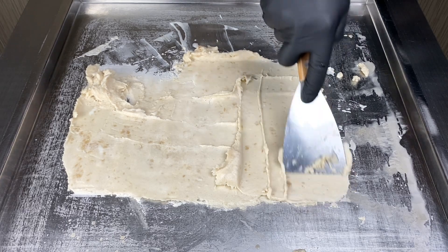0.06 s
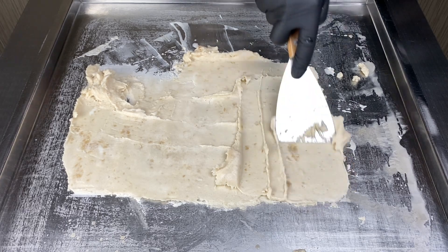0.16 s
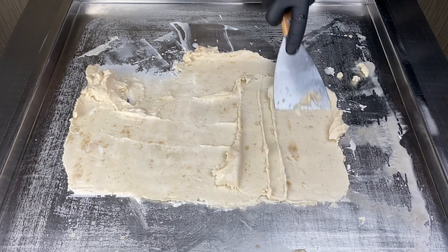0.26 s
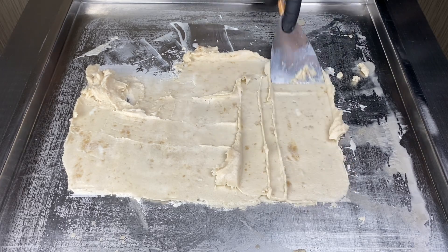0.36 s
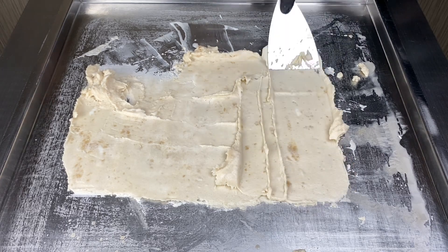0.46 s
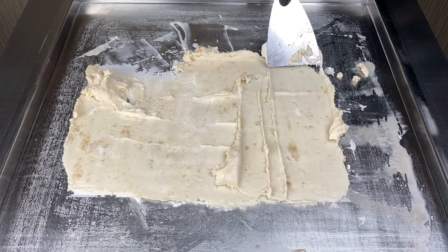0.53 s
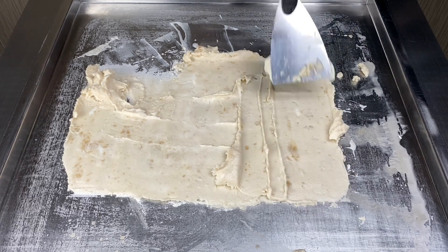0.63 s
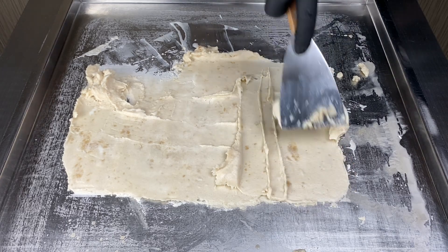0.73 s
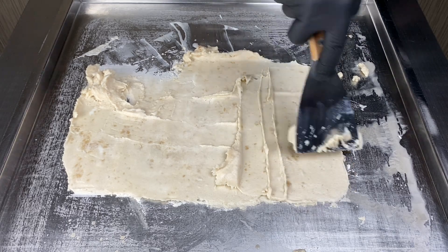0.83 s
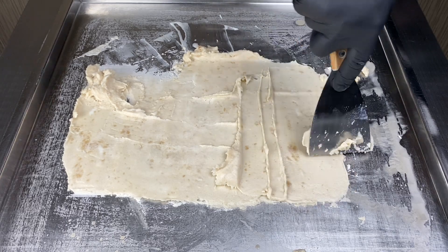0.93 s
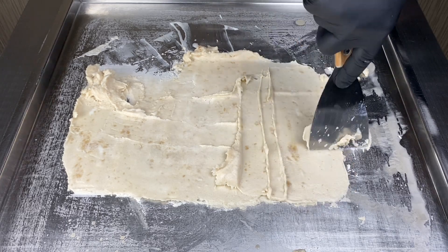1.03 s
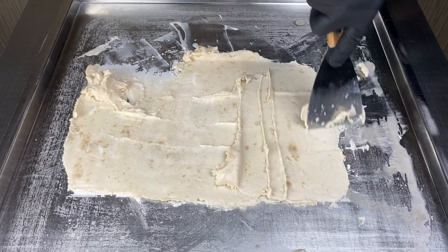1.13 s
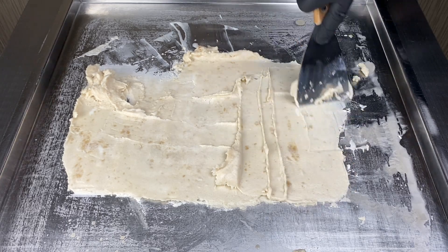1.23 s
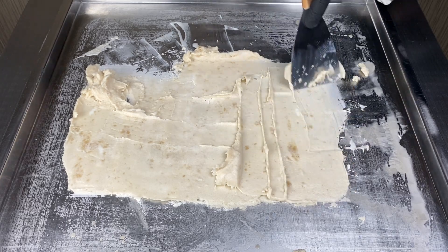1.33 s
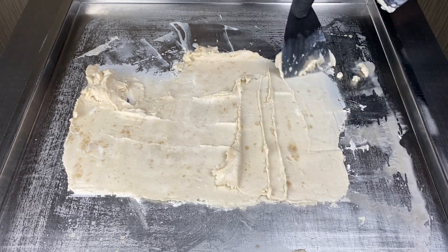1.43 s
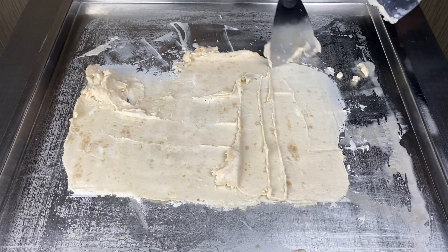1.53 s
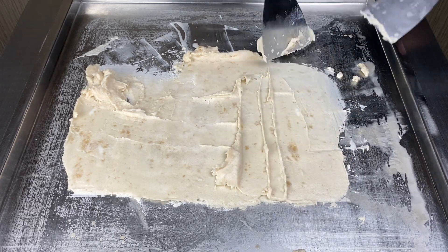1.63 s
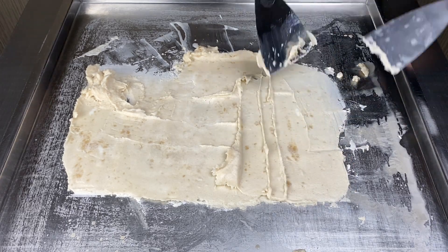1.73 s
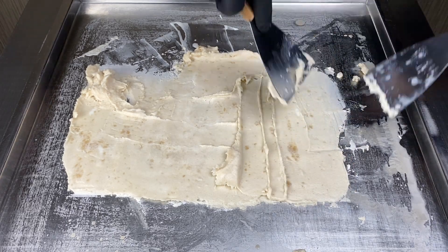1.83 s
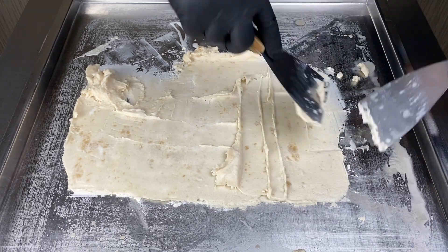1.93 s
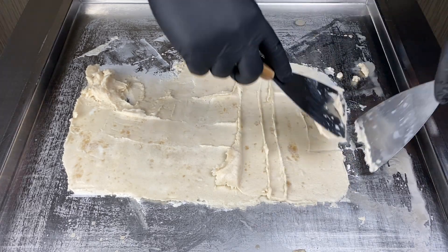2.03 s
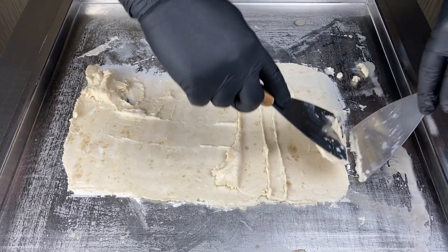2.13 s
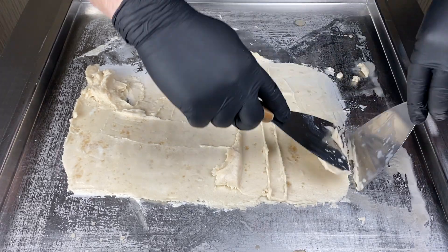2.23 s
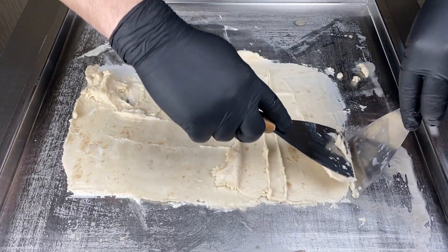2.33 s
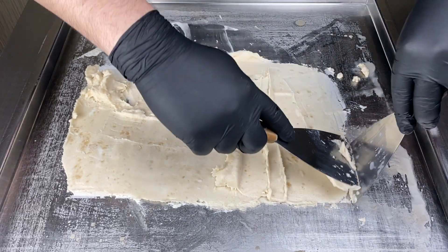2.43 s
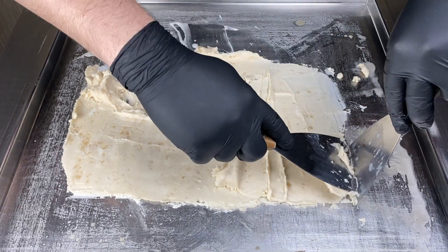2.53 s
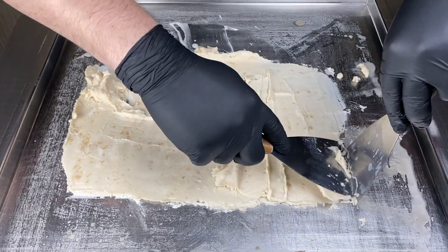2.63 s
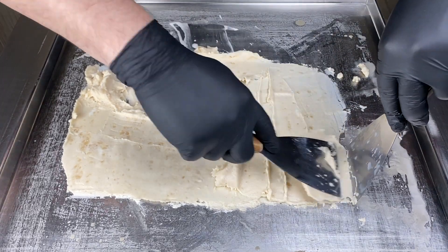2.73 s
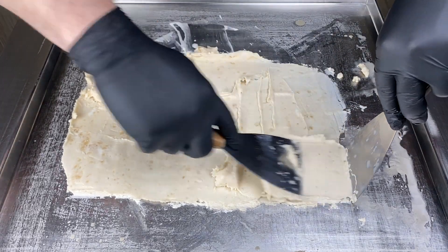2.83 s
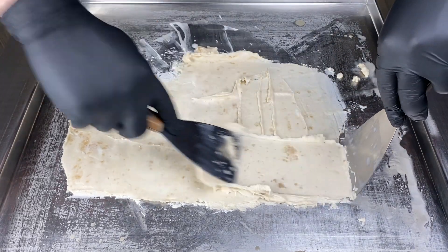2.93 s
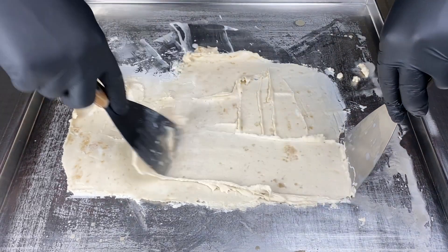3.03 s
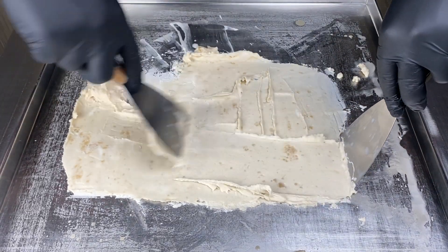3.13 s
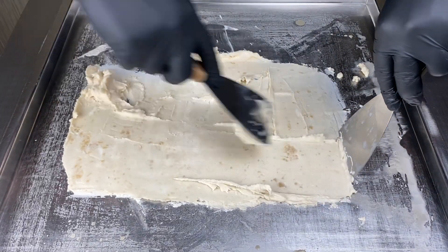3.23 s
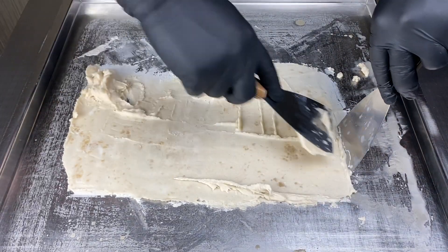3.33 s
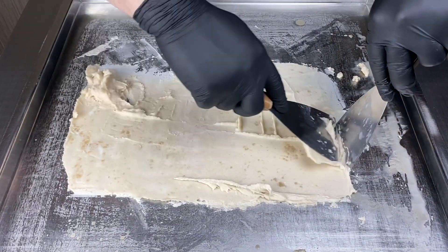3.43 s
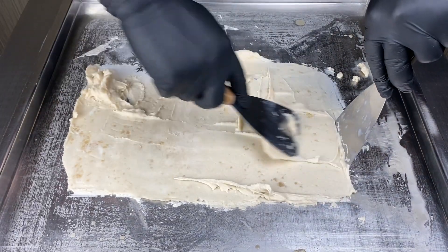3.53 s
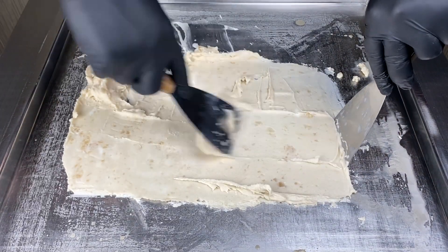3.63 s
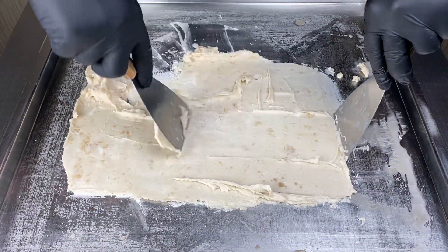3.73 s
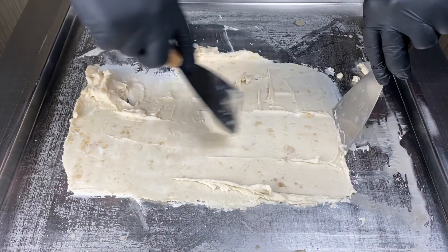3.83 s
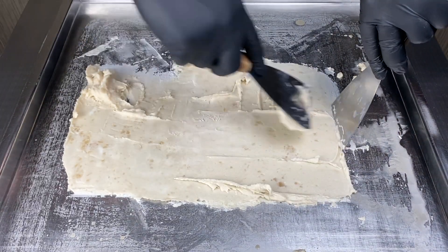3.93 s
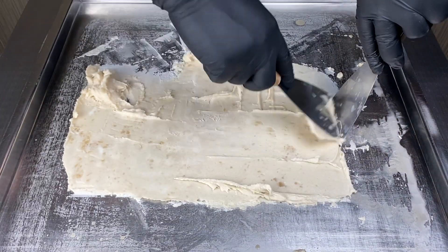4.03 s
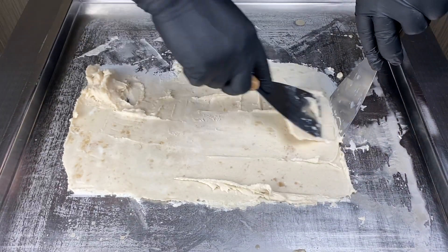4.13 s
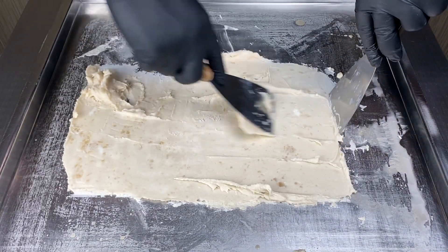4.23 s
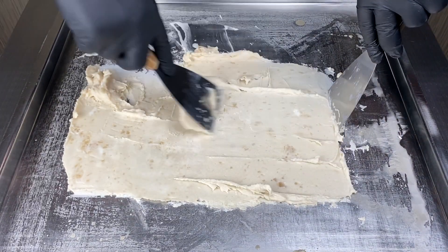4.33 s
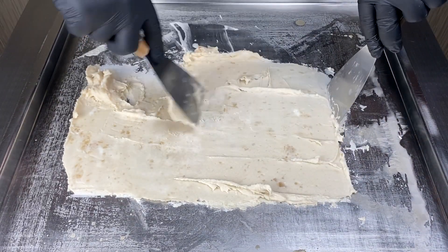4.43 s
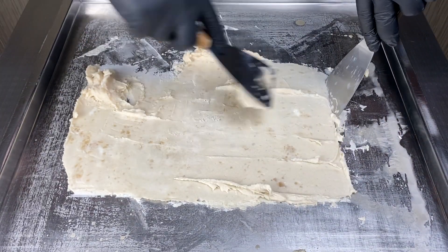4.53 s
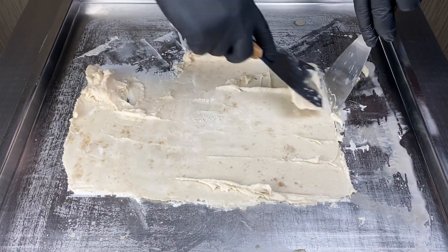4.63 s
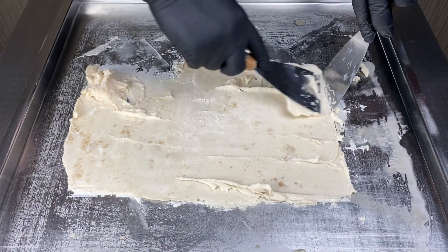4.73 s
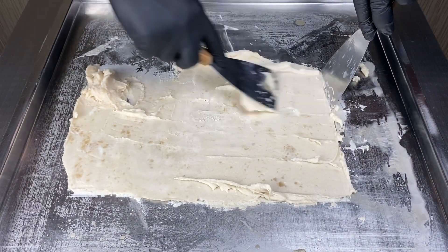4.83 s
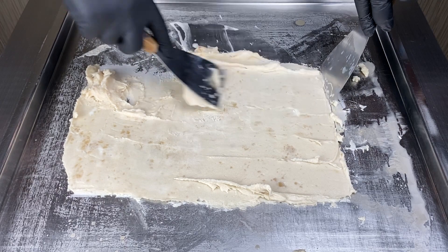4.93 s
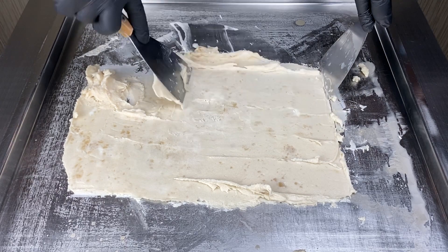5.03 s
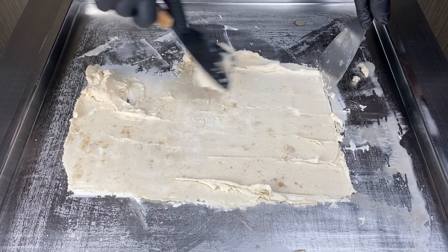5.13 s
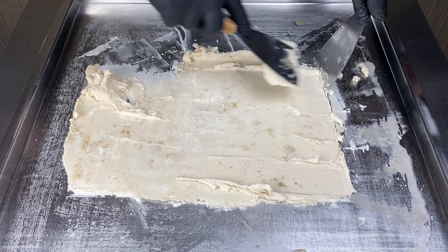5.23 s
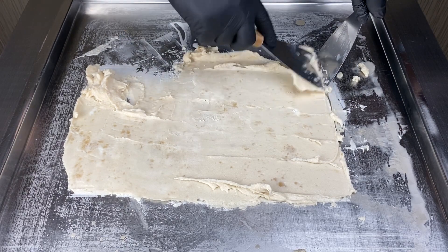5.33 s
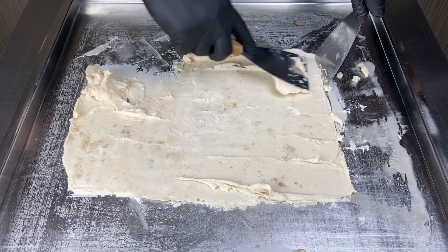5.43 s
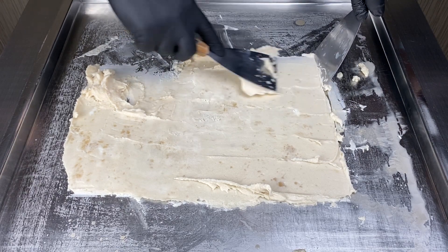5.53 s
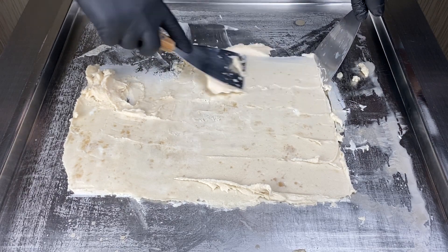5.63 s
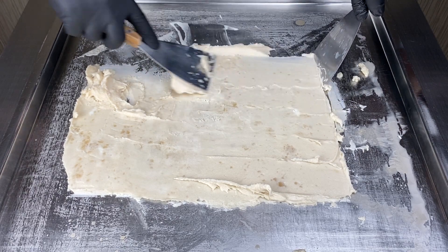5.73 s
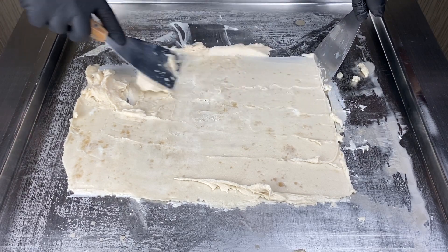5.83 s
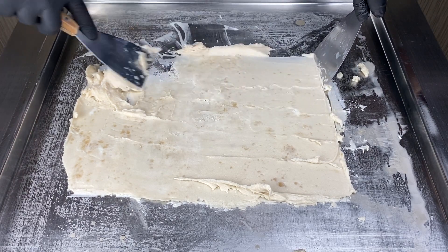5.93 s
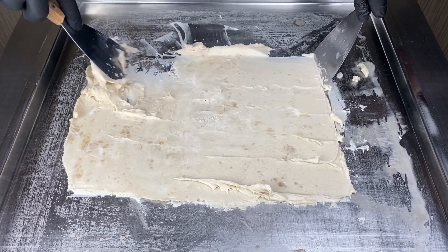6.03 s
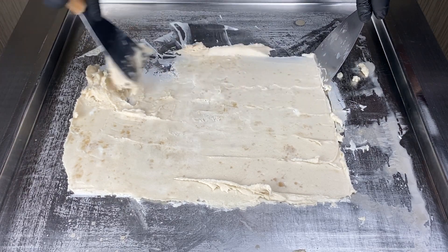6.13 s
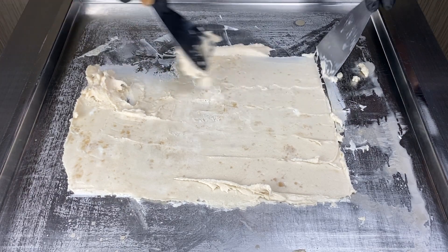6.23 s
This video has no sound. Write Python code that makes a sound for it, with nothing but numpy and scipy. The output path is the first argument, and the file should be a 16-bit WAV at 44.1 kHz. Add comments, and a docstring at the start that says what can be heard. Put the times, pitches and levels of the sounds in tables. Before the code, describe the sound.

Close stereo view of a steel spatula working freezing cream on a cold metal plate. A soft gritty hiss, then a short coarse grate and dull knocks near one second. Strokes follow steadily, with low hollow sheet booms and sharp metallic clacks, brightest past five seconds. A faint freezer rush runs underneath.

```python
"""A soft, gritty hiss comes first, over the faint rush of a freezer unit: a steel spatula shears a freezing
cream mixture on a stainless cold plate, heard from close by. The hiss is random friction noise in bands. The
rub also drives the sheet's low modes into a drone. Blade landings crack and boom: noise bursts excite decaying
modes of sheet and blade. Twice the edge grates over frosted steel in coarse, random slips. Soft pushes boom,
crumbs tick, and a few narrow bands of noise squeak or rub briefly."""
import sys
import numpy as np
from scipy import signal
from scipy.fft import rfft, irfft, next_fast_len
from scipy.io import wavfile

SR = 44100
rng = np.random.default_rng(int(sys.argv[2]) if len(sys.argv) > 2 else 0)


def wav_out(sig):
    """Save sig, one row per channel (or a flat mono array), as 16-bit PCM at SR to the path in sys.argv[1]."""
    wavfile.write(sys.argv[1], SR, np.round(np.clip(np.atleast_2d(sig).T, -1, 1) * 32767).astype(np.int16))


N = 276501
TIME = np.arange(N) / SR
CUTOFF_HZ = 16200

# blade landings: t/s, boom level/dB, body level/dB, clang level/dB, blade level/dB, tick level/dB,
# flexed blade f/Hz, clank level/dB, thunk f/Hz, thunk level/dB
LANDINGS = [(1.009, -47, -51.5, -69.5, -79, -73, 2260, -80, 628, -47.5),
            (1.2302, -48, -51.5, -53.5, -55, -45.5, 3300, -67, 776, -52),
            (2.265, -53, -49, -47, -50.5, -47, 3170, -67, 462, -45),
            (2.475, -61.5, -71, -66, -62, -50, 2120, -77, 543, -64),
            (3.4051, -51, -53, -51, -56.5, -37, 3603, -48.5, 662, -44),
            (4.0281, -43, -50, -47, -48.5, -27, 2550, -37, 548, -46.5),
            (4.082, -57.5, -68.5, -63, -59.5, -42, 2420, -61, 279, -46),
            (4.683, -44, -41, -43.5, -46.5, -28, 2000, -54, 631, -32.5),
            (5.317, -40.5, -41.5, -39, -32, -20.5, 3600, -28, 644, -33.5),
            (5.887, -44.5, -52, -61.5, -84, -54, 3780, -82, 562, -48)]
# the hand leans on the sheet, which booms softly: t/s, level/dB, t60/s
LEANS = [(0.361, -54.5, 0.58), (1.42, -48, 2.26), (2.411, -49.5, 0.23), (2.681, -57, 1.5),
         (3.059, -47.5, 0.3), (3.709, -48, 0.6), (4.32, -46, 0.61), (5.529, -53, 0.6), (5.884, -41, 0.4),
         (6.242, -64, 1.13)]
# modes of the steel sheet: f/Hz, level/dB, t60/s
SHEET_MODES = [(73, -2, 1.1), (96, -6, 1.0), (133, -1, 1.4), (167, 4, 1.6), (204, -1, 1.2), (256, -4, .7),
               (280, 1, 1.0), (312, -7, .9), (412, -4, .8), (453, 2, .6), (539, -1, .5), (627, 3, .45),
               (645, 0, .4), (773, 1, .35), (806, 0, .35)]
# modes of the blade: f/Hz, level/dB, t60/s
BLADE_MODES = [(1950, -6, .23), (2253, 2, .23), (2430, -4, .28), (2848, -3, .3), (2905, -6, .3),
               (3024, -6, .3), (3192, -4, .22), (3321, -4, .22), (3610, -4, .19), (3905, -1, .18),
               (4049, -4, .17), (4165, -3, .2), (6857, -8, .19)]

# the crowd of fine sheet modes: where it begins, its spacing, and how much the strengths differ
CROWD_ABOVE_HZ, MODE_SPACING_HZ, MODE_SPREAD_DB = 900, 55, 4.5

# adjoining band filters: (centre Hz, filter)
EDGES_HZ = np.geomspace(28, 17500, 27)
BANK = [(np.sqrt(lo * hi), signal.butter(2, [lo, hi], "band", fs=SR, output="sos"))
        for lo, hi in zip(EDGES_HZ, EDGES_HZ[1:])]


def from_db(db):
    """Level to amplitude ratio: 20 dB is a factor of ten."""
    return 10 ** (np.asarray(db) / 20)


def rms_one(x):
    """Normalisation to an rms of 1."""
    return x / np.sqrt(np.mean(x ** 2) + 1e-20)


def at_hz(points, hz):
    """Linear interpolation of a table on a log-frequency axis."""
    points = np.array(points)
    return np.interp(np.log(hz), np.log(points[:, 0]), points[:, 1])


def gains(rows, outside_db=None):
    """Envelopes: the dB columns of a curve in time, as amplitude ratios."""
    s, *columns = np.transpose(rows)
    return [from_db(np.interp(TIME, s, c, outside_db, outside_db)) for c in columns]


def fade(t, t60):
    """Exponential decay: the level falls by 60 dB in t60 seconds."""
    return np.exp(-np.log(1000) * t / t60)


def drift(rate):
    """Slow random modulation: normal deviates, `rate` per second, joined by straight lines."""
    knots = rng.standard_normal(4096)
    return np.interp(TIME * rate, np.arange(len(knots)), knots)


def add(out, s, sound):
    """Superposition of a sound that begins at s seconds."""
    start = max(0, round(s * SR))
    out[:, start:start + sound.shape[1]] += sound[:, :N - start]


def noise():
    """Two pairs of unrelated white noises, as long as the scene."""
    return rng.standard_normal((2, 2, N))


def stereo(pair, hz):
    """Partial coherence: two unrelated signals become left and right, as alike as the sheet radiates at hz."""
    # f/Hz, left-right correlation
    likeness = [(60, 0.92), (250, 0.95), (600, 0.39), (1400, 0.24), (3000, 0.56), (6000, 0.1)]
    # f/Hz, left minus right level/dB
    balance_db = [(150, 0.3), (700, 0.5), (1400, 0.5), (2800, 2.5), (5500, 3.5), (7000, -0.5)]
    alike = np.clip(at_hz(likeness, hz), -1, 1)
    common = np.sqrt((1 + alike) / 2) * pair[0]
    opposed = np.sqrt((1 - alike) / 2) * pair[1] * [[1], [-1]]
    return (common + opposed) * from_db(at_hz(balance_db, hz) / 2 * np.array([[1], [-1]]))


def coloured(draws, spectrum, patchy_db=0):
    """Band filtering: two pairs alternate over the bands, each wavering by patchy_db; stereo, rms 1."""
    out = 0
    for k, (hz, sos) in enumerate(BANK):
        if spectrum[0][0] / 2 < hz < spectrum[-1][0] * 2:
            level_db = at_hz(spectrum, hz) + patchy_db * drift(18)
            out = out + from_db(level_db) * stereo(signal.sosfilt(sos, draws[k % 2]), hz)
    return rms_one(out)


def resonate(x, hz, width_hz):
    """A damped resonator: a pole pair whose radius sets the bandwidth, with a peak gain near 1."""
    r = np.exp(-np.pi * width_hz / SR)
    poles = [1, -2 * r * np.cos(2 * np.pi * hz / SR), r * r]
    return signal.lfilter([(1 - r * r) / 2, 0, (r * r - 1) / 2], poles, x)


def friction(per_s, spread_db, smooth):
    """Granular friction: ice grains snap at random, a few much louder than the rest, over a smooth shear."""
    heights = from_db(spread_db * np.minimum(rng.exponential(1, N), 4))
    snaps = (rng.random(N) < per_s / SR) * heights
    # the power of each snap dies with a time constant of 2 ms
    power = signal.lfilter([1], [1, -np.exp(-1 / (0.002 * SR))], snaps ** 2 + 1e-18)
    return noise() * np.sqrt(power / power.mean() + smooth ** 2)


def rubbed(modes):
    """Sustained excitation: friction keeps modes sounding; the pressing blade damps and widens them."""
    out = 0
    for hz, db, t60 in modes:
        free_width_hz = np.log(1000) / (np.pi * t60)
        width_hz = free_width_hz + 1.67 + 0.019 * hz
        mode = rms_one(resonate(rng.standard_normal((2, N)), hz, width_hz))
        out = out + from_db(db) * stereo(mode, hz)
    return rms_one(out)


def struck(modes, force, t):
    """Modal superposition: each blow sets new random strengths and phases; close twin modes beat."""
    out = 0
    for hz, db, t60 in modes:
        twin_hz = hz * (1 + rng.uniform(.004, .014))
        pair = .8 * np.sin(2 * np.pi * (hz * t + rng.random((2, 1))))
        pair = pair + .6 * np.sin(2 * np.pi * (twin_hz * t + rng.random((2, 1))))
        swell = 1 - np.exp(-2 * t * hz)  # most of the build-up takes one cycle
        strength = from_db(db + at_hz(force, hz) + rng.normal(0, 1.9))
        out = out + strength * stereo(pair, hz) * swell * fade(t, t60)
    return out


def crowd(size):
    """High modal density: fine sheet modes as steady tones, unevenly spaced and strong; four signals."""
    count = int(CUTOFF_HZ / MODE_SPACING_HZ)
    hz = (np.arange(count) + rng.random(count)) * MODE_SPACING_HZ
    strength = from_db(MODE_SPREAD_DB * rng.standard_normal(count).clip(-2, 2))
    phase = np.exp(2j * np.pi * rng.random((2, 2, count)))
    lines = np.zeros((2, 2, size // 2 + 1), complex)
    lines[..., (hz * size / SR).astype(int)] = strength * phase
    return rms_one(irfft(lines, size))


def blow(force, t, crack_t60, ring_db):
    """Impact: a snap and a crack, treble first, then a decaying tail, of fine modes above and noise below."""
    # ring of the sheet: f/Hz, level/dB
    ring = [(40, 6.5), (70, 10.5), (150, 25.5), (300, 15), (650, 18.5), (1000, 12), (1600, 9.5), (3200, 5),
            (5500, -2), (7300, -12), (8300, -12.5), (10500, -13.5), (14000, -14), (16000, -22)]
    # crack over ring: f/Hz, level/dB
    crack_over_ring = [(130, -7), (250, 9), (600, 14), (1400, 12.5), (3200, 14), (7000, 20.5),
                       (12000, 19.5)]
    # decay of the ring: f/Hz, t60/s
    ring_t60 = [(60, 0.33), (160, 0.88), (420, 0.69), (1100, 0.15), (2900, 0.24), (7700, 0.17),
                (15000, 0.041)]
    white, tones, out = rng.standard_normal((2, 2, len(t))), crowd(len(t)), 0
    crack = .58 * fade(t, crack_t60) + 1.3 * fade(t, .004)
    for k, (hz, sos) in enumerate(BANK):
        arrive = 1 - np.exp(-t * max(hz, CROWD_ABOVE_HZ) / 2)
        source = tones if hz > CROWD_ABOVE_HZ else white
        tail = source[k % 2] * from_db(ring_db) * fade(t, at_hz(ring_t60, hz))
        contact = white[k % 2] * from_db(at_hz(crack_over_ring, hz)) * crack * arrive
        band = signal.sosfilt(sos, tail + contact)
        out = out + from_db(at_hz(force, hz) + at_hz(ring, hz)) * stereo(band, hz)
    return out


def thunk(hz, t, rise_s, t60):
    """A single mode: a panel swings up and gives one firm, nearly pure note, peak envelope 1."""
    swing = (1 - np.exp(-(t / rise_s) ** 2)) * fade(t, t60)
    return swing / swing.max() * np.sin(2 * np.pi * hz * t)


def room():
    """Broadband noise: a faint, even hiss of the room's still air."""
    # f/Hz, spectral level/dB per Hz
    air = [(500, 5), (4200, -5)]
    return from_db(-84) * coloured(noise(), air)


def freezer():
    """Flow noise: the steady rush of the cooling unit, with thin whistles of refrigerant as filtered noise."""
    # rush: f/Hz, spectral level/dB per Hz
    rush = [(25, 5.5), (60, 23), (170, 18), (350, 4.5), (850, 7.5), (1200, -24), (2200, -22), (3000, 3),
            (4000, -23), (5200, -8.5), (6600, 2), (8000, -2.5), (13500, 4), (16000, -20)]
    # whistles: f/Hz, width/Hz (of the first of two resonators), level/dB
    whistles = [(3100, 460, -86.5), (5120, 540, -82.5), (7980, 250, -86.5)]
    out = from_db(-70.0) * coloured(noise(), rush)
    for hz, width_hz, db in whistles:
        flow = resonate(rng.standard_normal((2, N)), hz, width_hz)
        out = out + from_db(db) * stereo(rms_one(resonate(flow, hz, 2 * width_hz)), hz)
    return out


def whumps():
    """Fundamental mode: every landing and every lean of the hand bows the whole sheet."""
    out, t = np.zeros((2, N)), TIME[:SR]
    for s, db, *_ in LANDINGS + LEANS:
        add(out, s, from_db(db) * thunk(73, t, rise_s=0.024, t60=0.31)[None])
    return out


def crumbs():
    """Light impact: the edge catches on frozen crumbs, bright ticks that hardly move the sheet."""
    # t/s, level/dB
    catches = [(0.359, -67), (1.1926, -52.5), (2.832, -59.5), (2.916, -56), (4.915, -55.5), (5.703, -53.5),
               (5.915, -65), (6.0265, -52)]
    out, t = np.zeros((2, N)), TIME[:SR // 4]
    for s, db in catches:
        force = [(200, db - 10.0), (2500, db), (9000, db)]
        tick = from_db(4.5) * blow(force, t, crack_t60=.008, ring_db=-10)
        add(out, s, tick + resonate(tick, rng.uniform(2700, 5420), width_hz=150))
    return out


def jerks():
    """Stick-slip release: the edge sticks on frost, jerks free, knocks the sheet and chirps the blade."""
    # t/s, level/dB
    releases = [(1.083, -49), (1.11, -49), (1.123, -46.5), (1.139, -50)]
    out, t = np.zeros((2, N)), TIME[:SR // 4]
    for s, db in releases:
        force = [(700, db), (1300, db - 7), (2500, db), (9000, db - 26)]
        knock = blow(force, t, crack_t60=.012, ring_db=-4.5)
        add(out, s, knock + resonate(knock, 2460, width_hz=160))
    return out


def grating():
    """Coarse friction: on bare frost the edge slips in random jerks that ring the blade."""
    # one table a scrape: t/s, grating level/dB, sizzle level/dB
    scrapes = [
        [(1.066, -67, -81), (1.093, -45.5, -62.5), (1.135, -38.5, -56), (1.172, -49, -61.5), (1.23, -58, -69)],
        [(5.868, -78, -71), (5.892, -73, -50), (5.945, -72, -59), (5.98, -60, -53.5), (6.03, -54.5, -47.5),
         (6.055, -46.5, -65)],
    ]
    # coarse rasp of the edge: f/Hz, spectral level/dB per Hz
    rasp = [(200, -12), (450, 12), (750, 13.5), (1100, 3), (1700, 4), (2400, 10), (3500, -5.5), (5000, -9),
            (9000, -33)]
    # hiss of the edge: f/Hz, spectral level/dB per Hz
    sizzle_spectrum = [(1500, -14), (4000, -0.5), (7000, -3), (9500, -2.5), (12500, -2), (14500, -12),
                       (16000, -16.5)]
    grate, sizzle = np.sum([gains(rows, outside_db=-120) for rows in scrapes], axis=0)
    slips = friction(per_s=550, spread_db=3.6, smooth=.4)
    edge = coloured(slips, rasp, patchy_db=1.0)
    steel = from_db(-5.5) * edge + from_db(-2) * resonate(edge, 780, width_hz=38)
    steel = steel + from_db(-11.0) * rubbed(BLADE_MODES)
    return grate * steel + from_db(4.5) * sizzle * coloured(slips, sizzle_spectrum, patchy_db=4)


def narrow_bands():
    """Amplitude modulation: low-passed noise on a carrier swells and fades; the highest band squeaks at a tilt
    of the blade, the lower ones near 1.2-1.4 kHz are brief patches of rub."""
    # narrow swells, rub patches near 1.2-1.4 kHz and one squeak: t/s, f/Hz, level/dB
    band_rows = [(3.025, 1400, -63), (3.3, 1200, -68), (3.271, 4600, -70)]
    swell_s, half_width_hz = 0.05, 150
    low_pass = signal.butter(2, half_width_hz, fs=SR, output="sos")
    narrow = rms_one(signal.sosfilt(low_pass, rng.standard_normal((2, N))))
    out = 0
    for s, hz, db in band_rows:
        swell = from_db(db) * np.exp(-((TIME - s) / swell_s) ** 2 / 2)
        out = out + swell * stereo(rms_one(narrow * np.sin(2 * np.pi * hz * TIME)), hz)
    return out


def stroke(start, peak, release, release_t60):
    """Force envelope: a quick bite, a level curve around its peak, and exponential decay from the release."""
    attack_s, ease_db = 0.028, 8  # ease: how far the level curve lies below its peak on either side
    bite = np.clip((TIME - start) / attack_s + .5, 0, 1)
    effort = from_db(np.interp(TIME, [start, peak, release], [-ease_db, 0, -ease_db]))
    return bite * effort * fade(np.maximum(TIME - release, 0), release_t60)


def swells(rows, rise_s):
    """Transient envelopes: each soft push builds up quickly and then decays exponentially."""
    out = 0
    for s, db, t60 in rows:
        rise = np.exp(-(np.minimum(TIME - s, 0) / rise_s) ** 2)
        out = out + from_db(db) * rise * fade(np.maximum(TIME - s, 0), t60)
    return out


def handwork():
    """Power summation: the hand drives drone, rub and hiss, and the powers of its strokes add."""
    # strokes: start t/s, level peak t/s, release t/s, paste hiss level/dB, rub level/dB, sheet drone level/dB;
    # one release comes before its peak, and the last stroke hisses on to the end
    strokes = [(0.013, 0.375, 0.52, -65.5, -62.5, -66.5), (1.205, 1.253, 1.53, -61.5, -49.5, -49.5),
               (2.444, 2.56, 2.63, -70.5, -53, -62), (2.841, 3.005, 3.23, -63.5, -48, -53),
               (3.17, 3.283, 3.33, -71.5, -57, -54), (3.5, 3.627, 3.77, -59, -55, -52),
               (3.974, 4.278, 5.04, -62.5, -56, -55), (4.5, 4.6, 4.54, -64.5, -54, -53),
               (4.776, 4.919, 5.053, -60.5, -46, -52.5), (5.087, 5.162, 5.48, -65, -54, -54.5),
               (5.36, 5.497, 5.75, -66, -56, -49.5), (5.716, 5.753, 8.6, -69.5, -59.5, -52)]
    # the edge meets the sheet through the paste and rubs without hissing: t/s, level/dB, t60/s
    rubs = [(0.35, -57, 0.28), (0.46, -60, 0.2), (3.61, -48.5, 0.32), (6.03, -41.5, 0.21)]
    # through the later strokes the blade never quite leaves the paste: from t/s, to t/s
    drag_from, drag_to = (2.72, 6.05)
    drag_rise_s, release_t60_s = 0.068, 0.2
    drone_t60_s = 0.9  # the sheet sounds on after a release
    drag = np.clip((TIME - drag_from) / drag_rise_s, 0, 1)
    drag = drag * fade(np.maximum(TIME - drag_to, 0), release_t60_s)
    drone = swells(LEANS, rise_s=0.018) ** 2
    rub = swells(rubs, rise_s=0.013) ** 2 + (from_db(-65) * drag) ** 2
    hiss = (from_db(-70) * drag) ** 2
    for start, peak, release, hiss_db, rub_db, drone_db in strokes:
        contact = stroke(start, peak, release, release_t60_s)
        hiss = hiss + (from_db(hiss_db) * contact) ** 2
        rub = rub + (from_db(rub_db) * contact) ** 2
        drone = drone + (from_db(drone_db) * stroke(start, peak, release, drone_t60_s)) ** 2
    return np.sqrt([drone, rub, hiss])


def spreading():
    """Sliding friction: the flat blade shears the paste with a gritty hiss and drives the low sheet modes."""
    # low drone of the sheet: f/Hz, spectral level/dB per Hz
    drone_spectrum = [(30, -26.5), (50, -10.5), (70, 3), (110, 5.5), (180, 6), (250, -35.5), (400, -36),
                      (800, -46)]
    # rub of the blade: f/Hz, spectral level/dB per Hz
    rub_spectrum = [(150, -28), (280, 1.5), (450, 2.5), (700, 0.5), (1000, -5.5), (1600, -8.5), (3000, -25)]
    # hiss of the paste: f/Hz, spectral level/dB per Hz
    paste_spectrum = [(400, -6.5), (900, 1.5), (1500, 4.5), (2000, 3), (2700, 1.5), (4000, -2), (5000, 4),
                      (6300, -3.5), (8500, 0), (12000, -3.5), (14000, -6), (16000, -13.5)]
    drone, rub, hiss = handwork()
    pressure = from_db(1.1 * drift(45))
    low = [mode for mode in SHEET_MODES if mode[0] < 300]
    middle = [mode for mode in SHEET_MODES if mode[0] > 400]
    sheet = from_db(-10.5) * rubbed(low) + from_db(-4.0) * coloured(noise(), drone_spectrum)
    fine_grit = friction(per_s=4500, spread_db=2.0, smooth=0.35)
    body = from_db(-12.5) * rubbed(middle) + from_db(-13) * coloured(fine_grit, rub_spectrum, patchy_db=-1.5)
    grit = friction(per_s=500, spread_db=3.5, smooth=1.5)
    paste = from_db(3.18) * coloured(grit, paste_spectrum, patchy_db=3.0)
    paste = paste + from_db(-13.0) * rubbed(BLADE_MODES)
    stick_slip = from_db(2.2 * drift(70) - .4)
    return drone * sheet + pressure * (rub * stick_slip * body + hiss * paste + narrow_bands())


def through_sheet(x):
    """Modal radiation: the fine modes of the sheet favour some pitches of the friction over their neighbours."""
    ripple_db = 3.2
    size = next_fast_len(N)
    hz = np.arange(size // 2 + 1) * SR / size
    knots = np.arange(CROWD_ABOVE_HZ, CUTOFF_HZ, MODE_SPACING_HZ)
    ripple = rms_one(from_db(ripple_db * rng.standard_normal(len(knots)).clip(-2, 2)))
    return irfft(rfft(x, size) * np.interp(hz, knots, ripple, 1, 1), size)[:, :N]


def clank(hz, t):
    """Mode cluster: close modes around the pitch of the flexed blade outlast the crack."""
    cluster = signal.butter(2, [.88 * hz, 1.12 * hz], "band", fs=SR, output="sos")
    pair = rms_one(signal.sosfilt(cluster, crowd(len(t))[0]))
    return stereo(pair, hz) * fade(t, t60=0.18)


def landings():
    """Impact excitation: the blade comes down and rings the sheet; paste under the edge softens some blows."""
    # centres of the boom, body, clang, blade and tick registers: f/Hz
    registers_hz = [140, 520, 1350, 3200, 9000]
    # broad resonances of the blade with its edge pressed down: f/Hz, width/Hz, level/dB
    pressed = [(1510, 350, 3), (2500, 1160, -1), (7180, 300, 0), (9880, 520, 3.5), (11070, 330, 4),
               (13200, 110, 9)]
    out, t = np.zeros((2, N)), TIME[:SR * 3 // 2]
    for s, *levels_db, blade_hz, clank_db, thunk_hz, thunk_db in LANDINGS:
        force = list(zip(registers_hz, levels_db))
        contact = blow(force, t, crack_t60=0.021, ring_db=-1.0)
        hit = contact + from_db(5) * resonate(contact, blade_hz, width_hz=220)
        for hz, width_hz, db in pressed:
            hit = hit + from_db(db + rng.normal(0, 1.02)) * resonate(contact, hz, width_hz)
        ringing = from_db(-3.5) * struck(SHEET_MODES, force, t)
        ringing = ringing + from_db(-7.5) * struck(BLADE_MODES, force, t)
        # the struck panel swings up, then the resting blade damps it
        note = from_db(thunk_db) * thunk(thunk_hz, t, rise_s=0.011, t60=0.12)
        flex = from_db(clank_db) * clank(blade_hz, t) + note
        add(out, s, from_db(2.5) * hit + ringing + flex)
    return out


def scene():
    """Linear superposition of all the sounds of the plate and its surroundings."""
    background = room() + freezer()
    rubbing = through_sheet(spreading() + grating())
    return background + whumps() + crumbs() + jerks() + rubbing + landings()


def record(dry):
    """Phase lag: in the treble one microphone port feeds both channels, left lagging; the top is cut."""
    # f/Hz, half turns of phase by which left lags
    port_lag = [(7200, 0), (9050, 1), (11200, 2), (13250, 3), (15000, 4)]
    mono_above_hz = 6500  # centre of a crossfade 1 kHz wide
    size = next_fast_len(N + 4096)
    left, right = rfft(dry, size)
    hz = np.arange(len(left)) * SR / size
    turn = np.pi / 2 * np.clip((hz - mono_above_hz) / 1000 + .5, 0, 1)
    shared = np.sin(turn) ** 2
    lag = np.exp(-1j * np.pi * np.interp(hz, *np.transpose(port_lag)))
    left = ((1 - shared) * left + shared * right) * lag
    both = irfft(np.array([left, right]), size)[:, :N]
    low_pass = signal.ellip(10, .2, 80, CUTOFF_HZ, fs=SR, output="sos")
    return signal.sosfilt(low_pass, both)


dry = scene()
out = record(dry)
wav_out(out)
```